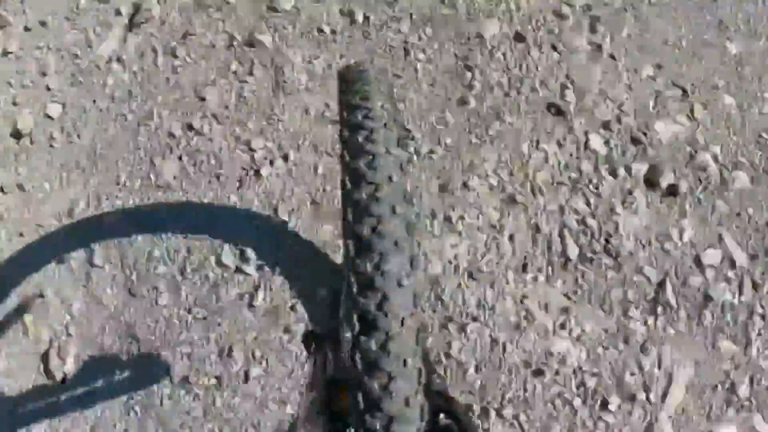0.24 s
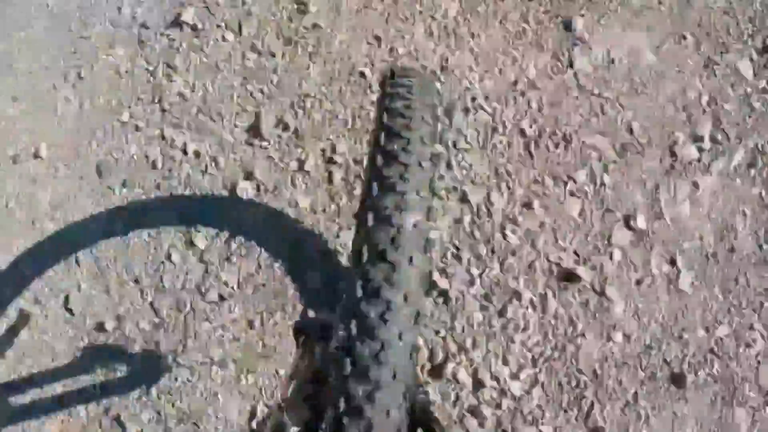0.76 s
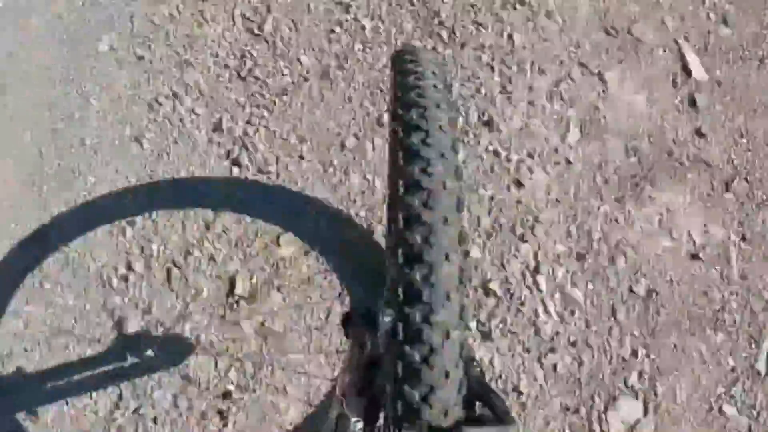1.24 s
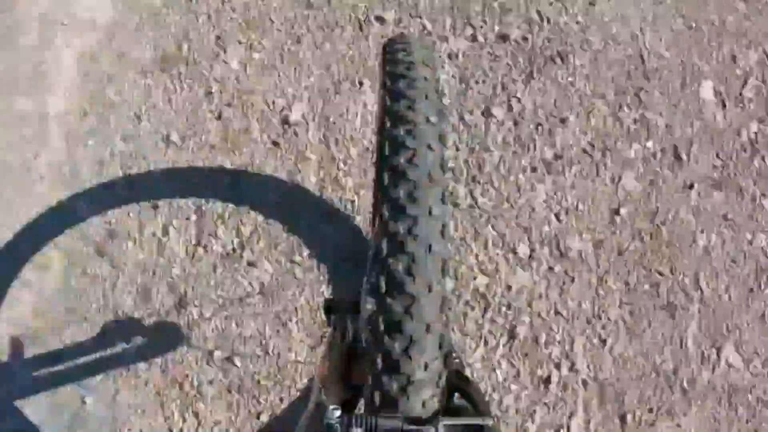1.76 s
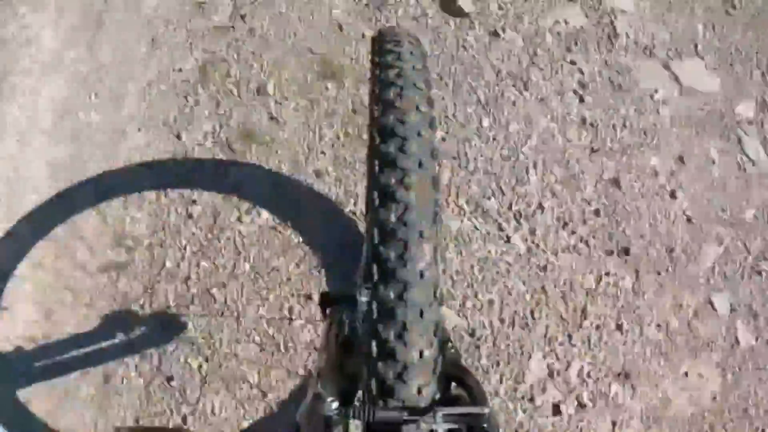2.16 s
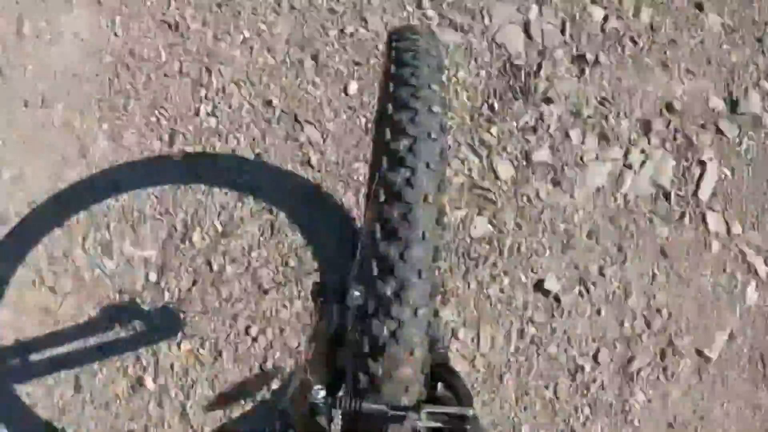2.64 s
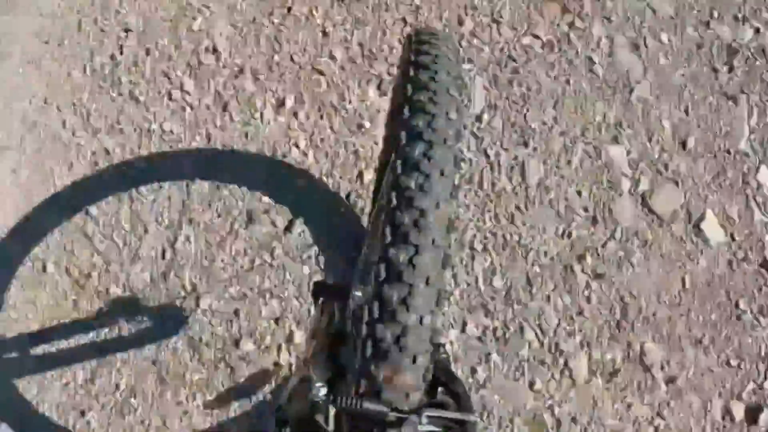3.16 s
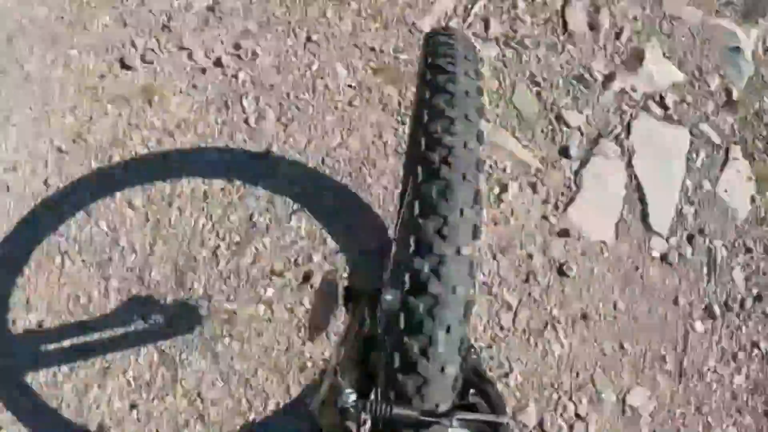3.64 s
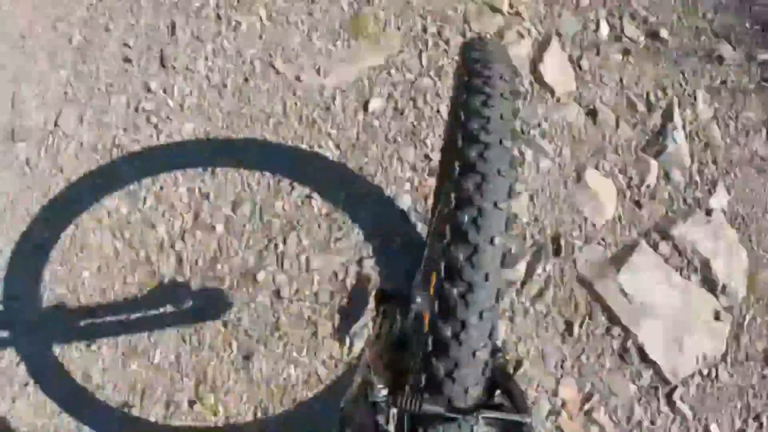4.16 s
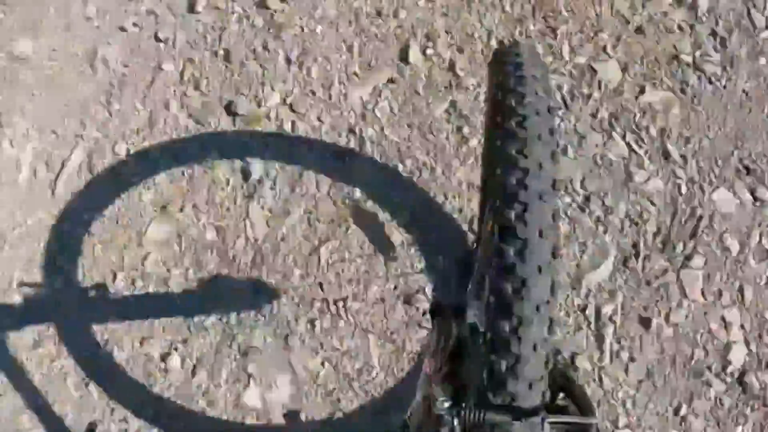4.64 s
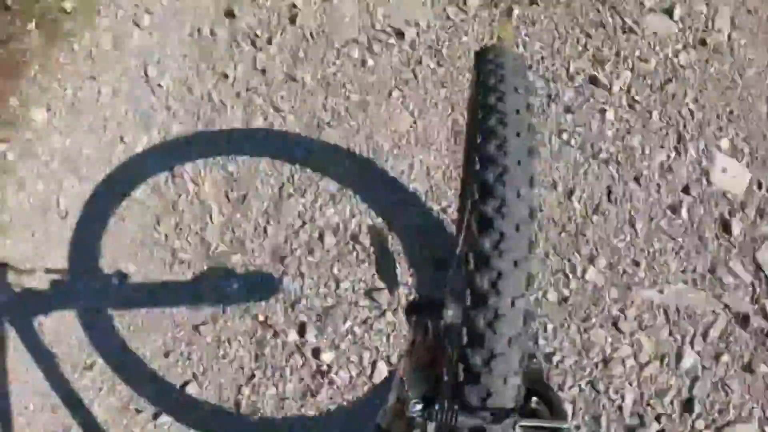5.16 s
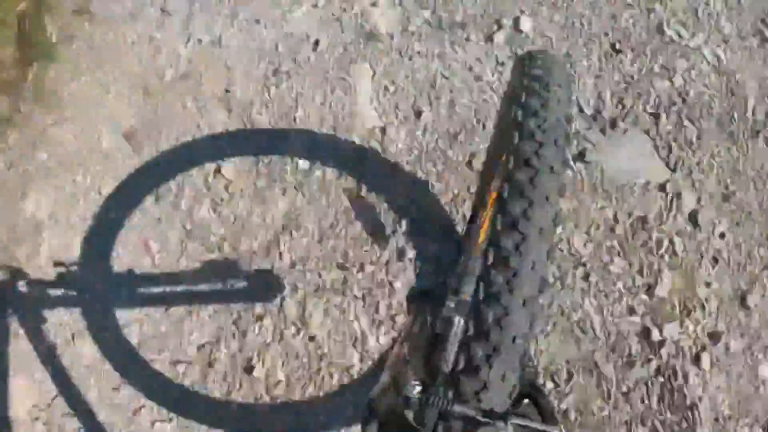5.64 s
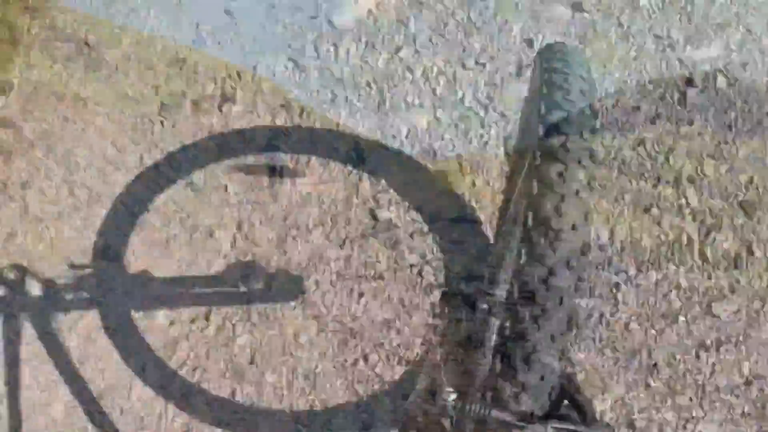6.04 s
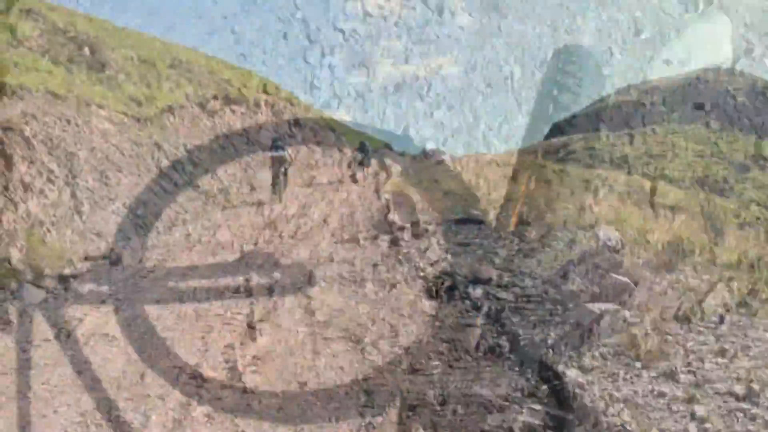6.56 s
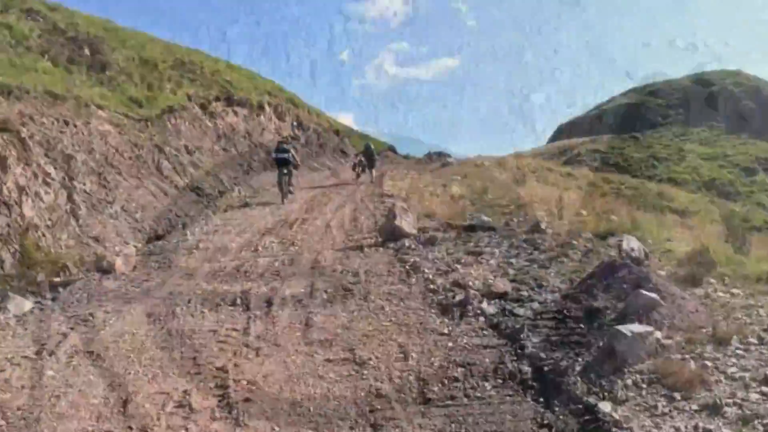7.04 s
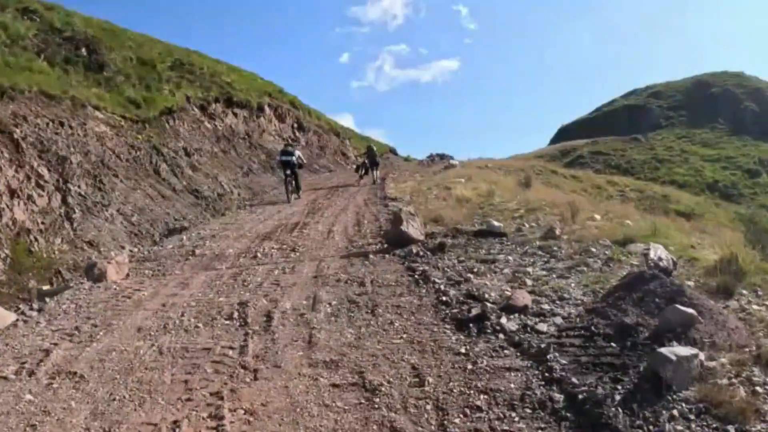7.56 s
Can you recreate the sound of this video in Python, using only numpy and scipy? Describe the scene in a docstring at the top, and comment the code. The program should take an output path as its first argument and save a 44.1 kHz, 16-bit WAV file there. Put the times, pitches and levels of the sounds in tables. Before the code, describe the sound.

A bike-mounted microphone hears a knobbly tyre rolling over loose gravel outdoors, close and without reverberation. From 0 s, dense gritty crunching, clicking pebbles and fine sandy hiss run steadily beneath sharp, irregular stone snaps, while low wind buffets in uneven lumps. The crunch is fuller around 0.8-1.1 s, with occasional hollow frame knocks and faint metal ticks. Around 2.5-2.8 s a dull tyre rumble and stronger wind flutter rise. From 3.1 to 4 s frame bumps come more often. At 4.1-4.7 s the tyre digs in and rebounds in quick surges, with a hard stone crack near 4.2 s and a strong low rattle at 4.6 s. Busy snapping continues at 5-5.7 s. From about 6 s gravel and wind sink; by 6.6 s the crunch is faint. Wind rises again, with sparse dull knocks near 6.8, 7.0, 7.35 and 7.6 s until the end at about 7.75 s.

```python
"""Mountain bike on loose gravel

Heard from a microphone on the bike. Grit crunches under the knobbly tyre as bursts of filtered noise and clicks,
mostly swelling and then dipping where the tyre digs in and rebounds. Pinched stones snap as short decaying sines
with noise, bumps ring the frame as damped modes, metal parts tick, and the tyre rumbles. Wind is lumpy low-pitched
noise. After six seconds the crunch fades, leaving wind and a few rattles."""
import sys
import numpy as np
from scipy import signal
from scipy.fft import rfft, irfft, next_fast_len
from scipy.io import wavfile
from scipy.ndimage import uniform_filter1d, map_coordinates

SR = 44100
rng = np.random.default_rng(int(sys.argv[2]) if len(sys.argv) > 2 else 0)


def store_wav(level_fs):
    """Save 16-bit WAV to argv[1]."""
    pcm = np.round(np.clip(np.atleast_2d(level_fs), -1, 1) * 32767)
    wavfile.write(sys.argv[1], SR, pcm.T.astype(np.int16))


N = 343539


def amp(db):
    """Decibels to gain."""
    return 10 ** (np.asarray(db) / 20)


def unit(x):
    """Scale to rms 1."""
    return x / np.sqrt(np.mean(x ** 2) + 1e-20)


def peaked(x):
    """Scale to peak 1."""
    return x / (np.abs(x).max() + 1e-20)


def curves(rows):
    """One value per sample for each column after the time."""
    s, *cols = np.transpose(rows)
    t = np.arange(N) / SR
    return [np.interp(t, s, c) for c in cols]


def wobble(knots_per_s):
    """Smooth random curve of rms 1."""
    at = np.arange(N) * knots_per_s / SR
    return unit(map_coordinates(rng.standard_normal(N // 16), [at], mode="wrap"))


def coloured(x, spectrum):
    """Minimum-phase filter with the gain of the (Hz, dB) points, built from the folded cepstrum."""
    size = 2 * next_fast_len(len(x) // 2 + 4096)
    hz, db = np.transpose(spectrum)
    bin_hz = np.fft.rfftfreq(size, 1 / SR)
    gain = amp(np.interp(np.log(bin_hz + 1), np.log(hz), db))
    cepstrum = irfft(np.log(np.maximum(gain, 1e-6)))
    cepstrum[1:size // 2] *= 2
    cepstrum[size // 2 + 1:] = 0
    response = np.exp(rfft(cepstrum))
    return irfft(rfft(x, size) * response, size)[:len(x)]


def add(track, s, sound):
    """Mix a sound into the track at time s."""
    part = track[max(round(s * SR), 0):][:len(sound)]
    part += sound[:len(part)]


# Tyre on the ground between bites. Each row: time in seconds, crunch level in dB.
CRUNCH_CURVE = [(0, -32.5), (0.55, -36), (0.75, -29), (1.08, -31), (1.22, -33.5), (2.1, -34), (3.3, -33),
                (4.05, -34.5), (4.4, -39), (4.95, -35), (5.3, -33), (5.65, -32.5), (6.1, -41), (6.6, -47.5),
                (7.2, -55.5), (7.35, -46), (7.75, -47.5)]
# Tyre digging in, then rebounding. Each row: time of the bite's centre in seconds, length in seconds,
# crunch added by the bite in dB, crunch taken off by the rebound in dB.
TYRE_BITES = [(0.425, 0.073, 2, -1), (1.094, 0.065, -1, 3.5), (1.446, 0.09, 1, 3), (1.612, 0.021, 6, -2),
              (1.968, 0.034, 1.5, 3.5), (2.286, 0.069, 2.5, 1), (2.73, 0.058, 2.5, 2.5),
              (2.879, 0.035, 3.5, 6), (4.042, 0.081, 0.5, 13), (4.148, 0.083, 11.5, 3),
              (4.252, 0.053, 9, 8.5), (4.321, 0.047, 8.5, 7.5), (4.506, 0.05, 6, 6), (4.594, 0.073, 10, 1),
              (4.7, 0.062, 2, 2), (4.85, 0.047, 1, 5.5), (5.164, 0.028, 2, 6), (5.297, 0.038, 3.5, -1.5),
              (5.814, 0.015, 7.5, 4), (5.99, 0.036, 7.5, 0.5), (6.266, 0.037, 9, 0.5),
              (7.381, 0.038, 4.5, 6)]


def tyre_load():
    """Crunch level in dB on uneven ground: most bites swell, then dip one length later as the tyre unloads.

    A negative bite thins the crunch, and a negative dip adds a second swell."""
    load_db, = curves(CRUNCH_CURVE)
    t = np.arange(N) / SR
    for s, length_s, bite_db, rebound_db in TYRE_BITES:
        u = (t - s) / length_s
        near = np.abs(u) < 3
        bite = bite_db * np.exp(-4 * u[near] ** 2)
        rebound = rebound_db * np.exp(-4 * (u[near] - 1) ** 2)
        load_db[near] += bite - rebound
    return load_db + 1.16 * wobble(17)


# level at which half the crunch is blurred into hiss, and the width of the change
BLUR_DB, BLUR_WIDTH_DB = -56, 2.5


def crispness(crunch_db):
    """Share of the crunch power heard as single grains, 0-1."""
    return .5 + .5 * np.tanh((crunch_db - BLUR_DB) / BLUR_WIDTH_DB / 2)


def blurred(contacts, crunch_db):
    """Faint crunching loses its single grains to steady noise."""
    crisp = crispness(crunch_db)
    return np.sqrt(crisp) * contacts + np.sqrt(1 - crisp) * rng.standard_normal(N)


def grains(rate_per_s, spread_db, clump_db, clump_knots_per_s, t60_s, bed):
    """Clumped contacts of unequal size, each a brief noise burst over a bed of fainter ones."""
    size = amp(spread_db * np.minimum(rng.standard_normal(N), 2.5))
    hits = (rng.random(N) < rate_per_s / SR) * size ** 2
    energy = signal.lfilter([1], [1, -amp(-120 / (t60_s * SR))], hits)
    energy = (energy / energy.mean() + bed) * amp(2 * clump_db * wobble(clump_knots_per_s))
    # the load on the tyre is shared out among the contacts of the moment
    energy /= np.abs(uniform_filter1d(energy, size=SR // 8)) + 1e-9
    return np.sqrt(energy) * rng.standard_normal(N)


def pebbles(rate_per_s, pitch_hz, scatter, cycles, spread_db):
    """Small stones click against each other; each rings for a few cycles at its own pitch."""
    count = int(rate_per_s * N / SR)
    when, pitch, size = rng.standard_normal((count, 3)).T[:, :, None]
    slot = np.arange(count)[:, None] + 3 * when
    start = (slot * N / count).astype(int) % N
    n = np.arange(SR // 200)
    turns = pitch_hz * np.exp(scatter * pitch) * n / SR
    level_db = spread_db * np.minimum(size, 2) - 60 * turns / cycles
    clicks = amp(level_db) * np.sin(2 * np.pi * turns)
    return np.bincount((start + n).ravel(), clicks.ravel(), N)[:N]


# Coarse stones shifting under the tread. Each row: time in seconds, level in dB before the gravel trim.
COARSE_CURVE = [(0, -32.5), (0.3, -37), (0.85, -28), (1.9, -36.5), (2.5, -32.5), (2.9, -34), (3.4, -32.5),
                (4.35, -35), (5.0, -36.5), (5.55, -30), (6.6, -46.5), (7.22, -45), (7.5, -40.5),
                (7.75, -42)]
# Spectra of fine grit, coarse rubble and sand. Each row: frequency in Hz, relative density in dB per Hz.
GRIT_SPECTRUM = [(300, -16.5), (700, -16), (1100, 0), (1600, 0.5), (2100, -7), (2850, -0.5), (3400, -1.5),
                 (4000, -11), (4800, -18.5), (7000, -28), (8500, -41), (11500, -45), (15000, -68)]
RUBBLE_SPECTRUM = [(150, -27.5), (300, -1), (450, -6), (570, -9), (700, 3), (780, -0.5), (856, 4), (930, 3),
                   (1030, 3.5), (1200, 4), (1700, -1), (3000, -35.5), (9000, -110)]
SAND_SPECTRUM = [(1500, -19), (4000, 7), (5500, 0), (7300, -2), (8500, -11), (11000, -19.5), (13000, -29.5),
                 (15000, -59)]


def gravel(crunch_db):
    """The tread grinds fine grit, clicks clumps of pebbles, sprays sand and shoves coarser stones together."""
    coarse_db, = curves(COARSE_CURVE)
    fine = grains(rate_per_s=1300, spread_db=2.5, clump_db=3.0, clump_knots_per_s=65, t60_s=0.0018, bed=1.0)
    fine = blurred(fine, crunch_db)
    heavy = grains(rate_per_s=650, spread_db=4.5, clump_db=2.5, clump_knots_per_s=50, t60_s=0.017, bed=0.37)
    dust = grains(rate_per_s=1400, spread_db=7.5, clump_db=2.0, clump_knots_per_s=59, t60_s=0.0021, bed=1.0)
    dust = blurred(dust, crunch_db)
    clicks = pebbles(rate_per_s=800, pitch_hz=2500, scatter=.4, cycles=6.5, spread_db=6.5)
    clicks = blurred(unit(clicks * amp(1.4 * wobble(70))), crunch_db)
    grit = amp(crunch_db - 3) * unit(coloured(fine, GRIT_SPECTRUM))
    clicking = amp(crunch_db - 2.5) * unit(coloured(clicks, GRIT_SPECTRUM))
    # every sharp contact also has a dull side
    contacts = heavy + 0.45 * (fine + clicks)
    rubble = amp(coarse_db - 2.0) * unit(coloured(contacts, RUBBLE_SPECTRUM))
    # sand keeps trickling, so it swells less than the crunch
    sand = amp(0.75 * crunch_db - 26.0) * unit(coloured(dust, SAND_SPECTRUM))
    return grit + clicking + rubble + sand


# STRAY_DB is relative to the crunch
STRAYS_PER_S, STRAY_DB, STRAY_SPREAD_DB, STRAY_HZ = 45, 12, 1.8, 2590


def strays(crunch_db):
    """Rows (s, peak dB, pitch Hz) of lesser stones, which snap harder the more the tyre crunches."""
    when, size, pitch = rng.random((int(STRAYS_PER_S * N / SR), 3)).T
    at = (when * (N - 1)).astype(int)
    size_db = STRAY_DB + STRAY_SPREAD_DB * np.minimum(-np.log(1 - size) - 1, 2)
    peak_db = crunch_db[at] + size_db + 10 * np.log10(crispness(crunch_db[at]))
    return list(zip(at / SR, peak_db, STRAY_HZ * 2 ** (pitch - .5)))


# Biggest pinched stones. Each row: time in seconds (the snap starts 0.98 ms later), peak in dB, pitch in Hz.
BIG_STONES = [(0.217, -17, 2900), (0.4119, -9, 2890), (0.4514, -12, 2380), (0.4608, -14.5, 2400),
              (0.5689, -16.5, 1530), (0.601, -14.5, 2720), (0.7705, -12.5, 2540), (0.892, -12.5, 2000),
              (0.907, -13, 3100), (1.0544, -10.5, 2010), (1.113, -12, 2530), (1.14, -10, 1600),
              (1.408, -11.5, 1360), (1.74, -17.5, 2980), (1.955, -16.5, 2920), (2.257, -19, 2560),
              (2.413, -14, 3050), (2.619, -17.5, 2460), (2.836, -14.5, 2730), (2.8937, -17.5, 1930),
              (3.2068, -20, 2970), (3.2717, -19, 1960), (3.3607, -11, 2800), (3.385, -13.5, 2750),
              (3.544, -13.5, 2500), (3.5663, -15, 1870), (3.8067, -10.5, 2900), (3.9608, -15, 3070),
              (4.1445, -14, 1390), (4.1622, -20, 1490), (4.179, -19, 1660), (4.1874, -8.5, 1780),
              (4.2105, -20, 1700), (4.529, -11.5, 1680), (4.605, -19, 2700), (4.702, -13, 2670),
              (4.8434, -14.5, 2740), (4.867, -15, 2300), (4.954, -19.5, 2300), (5.062, -14.5, 2760),
              (5.168, -13.5, 2400), (5.234, -17, 2400), (5.28, -13, 2820), (5.3045, -15, 2500),
              (5.415, -11, 1880), (5.4804, -13, 2800), (5.55, -12, 1610), (5.587, -11, 2930),
              (5.635, -11, 1570), (5.651, -13, 2060), (5.8113, -13.5, 1530), (5.924, -19, 2520),
              (6.0337, -15, 2260), (6.096, -20, 2600), (6.271, -18, 2400), (6.383, -24.5, 2700),
              (6.54, -25, 2570)]
# Snap spectrum, shifted down for low stones. Each row: frequency in Hz, relative gain in dB.
SNAP_SPECTRUM = [(100, -53.5), (500, 3.5), (1500, 0), (3300, 2.5), (4200, -6.5), (7000, -25.5), (8500, -41),
                 (12000, -60), (16000, -64)]
SNAP_T60_S, SCRAPE_T60_S, REBOUND_SHARE, SCRAPE_SHARE = .004, .04, .3, .13


def stones(crunch_db):
    """A pinched stone cracks, rings for a few cycles, rebounds faintly and scrapes its neighbours."""
    track, t = np.zeros(N), np.arange(SR // 25) / SR
    for s, db, hz in BIG_STONES + strays(crunch_db):
        crack, scrape = rng.standard_normal((2, len(t)))
        snap = (np.sin(2 * np.pi * hz * t) + 1.2 * crack) * amp(-60 * t / SNAP_T60_S)
        add(snap, rng.uniform(.0008, .004), REBOUND_SHARE * snap)
        snap += SCRAPE_SHARE * scrape * amp(-60 * t / SCRAPE_T60_S)
        # bigger, lower stones also crack more dully
        shift = min(1, np.sqrt(hz / STRAY_HZ))
        colour = [(f * shift, d) for f, d in SNAP_SPECTRUM]
        add(track, s + 0.00098, amp(db) * peaked(coloured(snap, colour)))
    return track


# Bumps that knock the frame. Each row: start in seconds, peak in dB, strongest ring in Hz.
FRAME_KNOCKS = [(0.637, -23.5, 1010), (0.812, -23, 845), (1.139, -24, 704), (1.408, -27, 867),
                (1.618, -20.5, 738), (2.517, -21, 400), (3.133, -18.5, 580), (3.249, -21, 560),
                (3.335, -18.5, 600), (3.432, -16.5, 580), (3.7, -18, 540), (3.931, -15.5, 860),
                (4.033, -26, 603), (4.177, -23, 1000), (4.37, -23, 450), (4.6035, -13.5, 400),
                (4.618, -22, 450), (5.892, -23.5, 1130), (6.807, -24.5, 325), (6.995, -21.5, 345),
                (7.168, -33, 1200), (7.343, -24, 493), (7.355, -20.5, 438), (7.368, -22, 438),
                (7.455, -22, 880), (7.625, -23, 480)]
# Modes of frame and fork before scatter. Each row: frequency in Hz, level in dB, t60 in seconds.
FRAME_MODES = [(271, 7.5, 0.074), (327, 7, 0.05), (465, 7, 0.027), (580, -2, 0.078), (671, -8, 0.19),
               (840, -4, 0.029), (987, 8.5, 0.028), (1270, -6, 0.096), (1680, 1, 0.037), (2050, 0, 0.056)]
# Shudder of loose parts before the tilt around the knock's pitch. Each row: frequency in Hz, gain in dB.
SHUDDER_SPECTRUM = [(150, -20.5), (300, -2), (1000, -3.5), (2200, -8.5), (3400, -6), (4500, -26),
                    (9000, -41)]
# modes and shudder fall off to either side of the knock's pitch
RING_DB_PER_OCTAVE, SHUDDER_DB_PER_OCTAVE = 14.5, 8
SHUDDER_SHARE, SHUDDER_RISE_S, KNOCK_RISE_S = 0.55, 0.005, 0.0019


def knocks():
    """A bump rings the frame, most strongly around one pitch, and sets off a short shudder of loose parts."""
    track, t = np.zeros(N), np.arange(SR // 6) / SR
    hz, level_db, t60_s = np.transpose(FRAME_MODES)[:, :, None]
    for s, db, centre_hz in FRAME_KNOCKS:
        scatter, detune, phase = rng.standard_normal((3, len(hz), 1))
        strength_db = level_db + 2 * scatter - RING_DB_PER_OCTAVE * np.abs(np.log2(hz / centre_hz))
        turns = hz * (1 + 0.018 * detune) * t + phase
        ring = (amp(strength_db - 60 * t / t60_s) * np.sin(2 * np.pi * turns)).sum(0)
        colour = [(f, d - SHUDDER_DB_PER_OCTAVE * abs(np.log2(f / centre_hz))) for f, d in SHUDDER_SPECTRUM]
        swell = t * np.exp(-.5 * (t / SHUDDER_RISE_S) ** 2)
        shudder = coloured(rng.standard_normal(len(t)) * swell, colour)
        blow = peaked(ring) + SHUDDER_SHARE * peaked(shudder)
        blow *= 1 - np.exp(-t / KNOCK_RISE_S)
        add(track, s, amp(db) * peaked(blow))
    return track


# Small metal parts. Each row: start in seconds, peak in dB.
METAL_TICKS = [(1.267, -23), (1.419, -26), (2.694, -25), (4.187, -28), (4.492, -30), (4.553, -30),
               (4.582, -27), (4.602, -20), (5.68, -29)]
# Tick spectrum. Each row: frequency in Hz, relative gain in dB.
METAL_SPECTRUM = [(300, 17.5), (2000, 5.5), (7000, 0.5), (9000, -11), (12000, -16.5), (15000, -32)]
TICK_RISE_S, TICK_T60_S = .004, 0.04


def ticks():
    """Scraping contacts of metal: filtered noise bursts with a soft onset and fast decay."""
    track, t = np.zeros(N), np.arange(SR // 20) / SR
    for s, db in METAL_TICKS:
        envelope = (1 - np.exp(-t / TICK_RISE_S)) * amp(-60 * t / TICK_T60_S)
        burst = rng.standard_normal(len(t)) * envelope
        add(track, s, amp(db) * peaked(coloured(burst, METAL_SPECTRUM)))
    return track


# Tyre drumming on rougher ground. Each row: time in seconds, rumble level in dB.
DRUMMING_CURVE = [(0, -53), (2.2, -44.5), (2.42, -38.5), (2.7, -34), (2.88, -50), (3.1, -36.5),
                  (3.75, -46.5), (4.05, -40), (4.45, -35), (4.85, -56.5), (5.7, -41), (6.5, -50),
                  (7.2, -50), (7.75, -43)]
# Rumble spectrum. Each row: frequency in Hz, relative density in dB per Hz.
ROLL_SPECTRUM = [(100, -20), (240, 3), (330, -2.5), (400, -4.5), (500, -2.5), (620, -5), (1000, -25.5),
                 (3000, -36), (10000, -110)]


def rolling():
    """The tyre thuds over embedded stones; the thuds run together into a lumpy rumble."""
    rumble_db, = curves(DRUMMING_CURVE)
    thuds = grains(rate_per_s=110, spread_db=3, clump_db=2, clump_knots_per_s=22, t60_s=.025, bed=.2)
    return amp(rumble_db) * unit(coloured(thuds, ROLL_SPECTRUM))


def eddies(spectrum, lump_db, lump_knots_per_s):
    """Turbulent pressure of even mean strength, arriving in quick lumps."""
    air = coloured(rng.standard_normal(N), spectrum) * amp(lump_db * wobble(lump_knots_per_s))
    power = np.abs(uniform_filter1d(air ** 2, size=SR // 5))
    return air / np.sqrt(power + 1e-12)


# Large eddies hitting the microphone. Each row: time in seconds, buffet level in dB before trim.
GUST_CURVE = [(0, -21), (0.38, -23), (0.8, -27), (1.25, -20.5), (1.38, -25.5), (1.85, -22), (2.15, -29.5),
              (2.32, -21.5), (2.5, -25.5), (3.6, -26), (4.35, -22.5), (5.7, -22), (6.3, -35), (6.6, -37.5),
              (6.72, -30), (7.75, -25)]
# Air streaming past the microphone. Each row: time in seconds, flutter level in dB before scaling.
AIRFLOW_CURVE = [(0, -22.5), (0.8, -27), (1.2, -25.5), (1.33, -31), (1.55, -24.5), (1.85, -29),
                 (2.12, -39.5), (2.55, -20.5), (2.9, -27), (3.1, -23), (3.43, -22.5), (3.58, -23.5),
                 (3.72, -21), (3.85, -28), (4.6, -23.5), (5.14, -27), (5.3, -34), (5.65, -30.5),
                 (6.3, -42.5), (6.6, -43), (6.78, -34), (7.75, -33)]
# Wind spectra. Each row: frequency in Hz, relative density in dB per Hz.
BUFFET_SPECTRUM = [(8, -3.5), (20, 3), (30, -3.5), (55, -1.5), (85, -7.5), (130, -23.5), (250, -50.5),
                   (900, -120)]
THUMP_SPECTRUM = [(25, -21), (50, -4), (70, -3), (95, -3), (135, -12.5), (250, -40.5), (900, -120)]
FLUTTER_SPECTRUM = [(50, -25.5), (85, -3.5), (120, -1), (155, -8.5), (200, -16), (280, -23), (450, -42.5),
                    (8000, -120)]
RUSH_SPECTRUM = [(90, -16.5), (165, 2), (215, -5), (290, -18), (480, -19.5), (1400, -42.5), (4000, -67),
                 (10000, -120)]


def wind():
    """Large eddies buffet the microphone; faster air adds thumps, a higher flutter and a rush."""
    buffet_db, = curves(GUST_CURVE)
    flutter_db, = curves(AIRFLOW_CURVE)
    buffet = amp(buffet_db + 2.5) * eddies(BUFFET_SPECTRUM, lump_db=1.5, lump_knots_per_s=18)
    # middle-sized eddies follow both the gusts and the airflow
    thump_db = (buffet_db + flutter_db) / 2 - 4.0
    thump = amp(thump_db) * eddies(THUMP_SPECTRUM, lump_db=3.5, lump_knots_per_s=28)
    flutter = amp(1.08 * flutter_db + 0.8) * eddies(FLUTTER_SPECTRUM, lump_db=2.5, lump_knots_per_s=35)
    # small eddies grow faster with the flow than large ones
    rush = amp(1.293 * flutter_db + 1.08) * eddies(RUSH_SPECTRUM, lump_db=0.5, lump_knots_per_s=41)
    return buffet + thump + flutter + rush


def scene():
    """Sum of all sources, close to the microphone in open air, without reverberation."""
    crunch_db = tyre_load()
    tyre = rolling() + gravel(crunch_db) + stones(crunch_db)
    return (wind() + tyre + knocks() + ticks())[None]


TOP_HZ = 15100


def record(dry):
    """Band limit of the microphone chain: nothing passes from TOP_HZ up."""
    size = next_fast_len(N + SR // 2)
    passband = np.fft.rfftfreq(size, 1 / SR) < TOP_HZ
    return irfft(rfft(dry, size) * passband, size)[:, :N]


dry = scene()
out = record(dry)
store_wav(out)
```